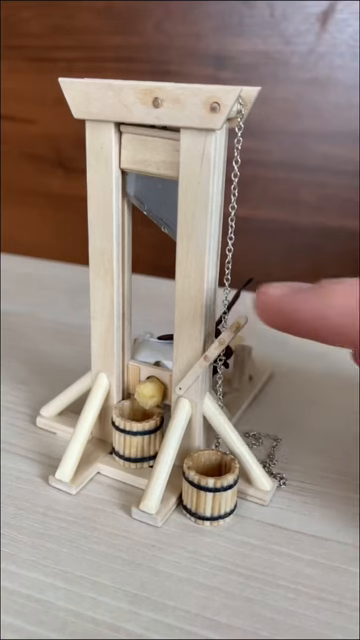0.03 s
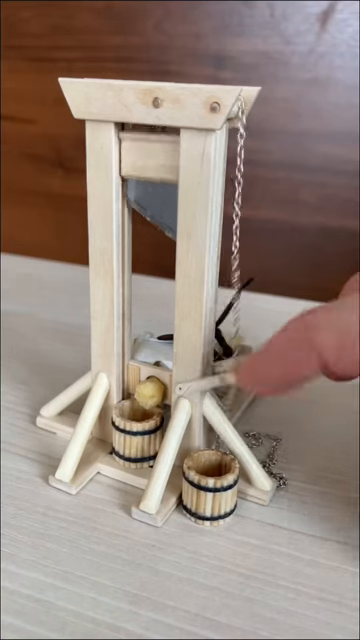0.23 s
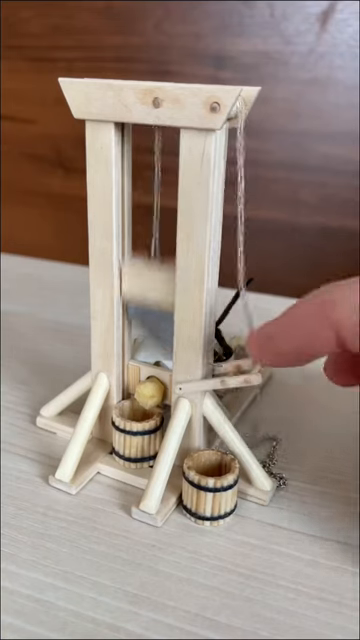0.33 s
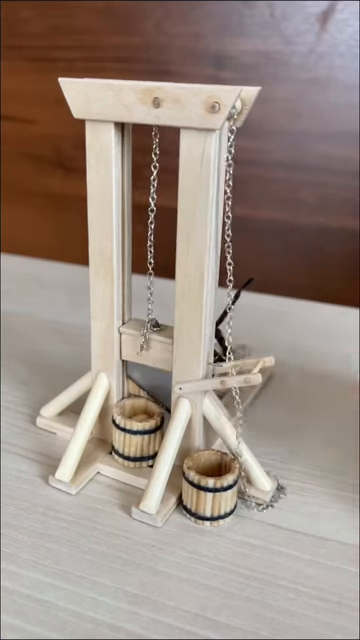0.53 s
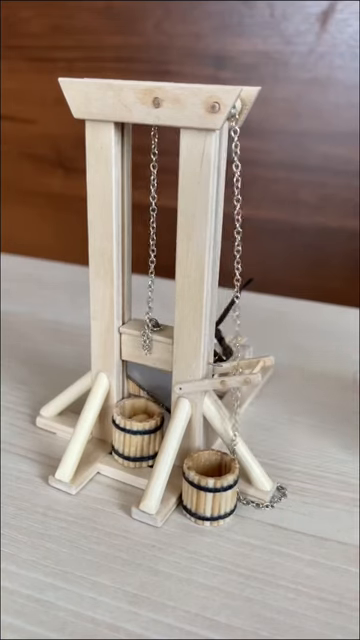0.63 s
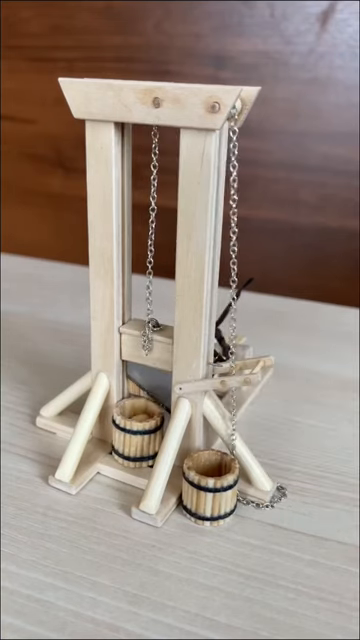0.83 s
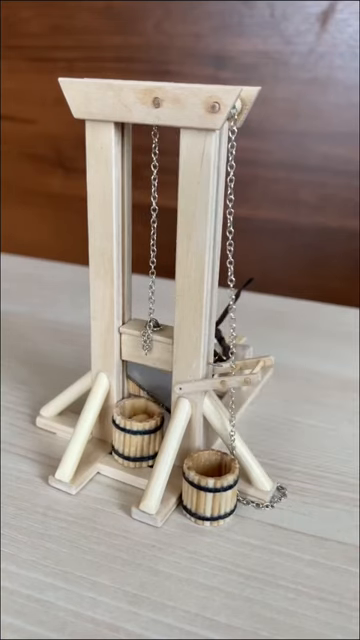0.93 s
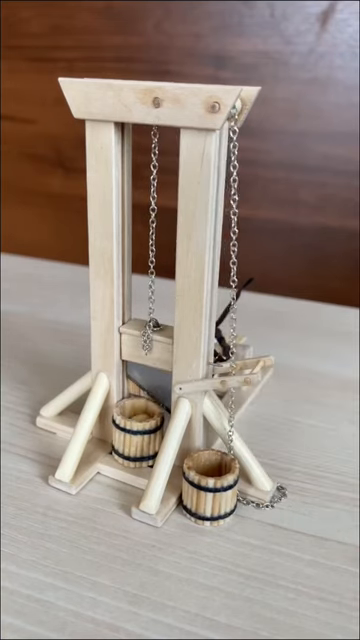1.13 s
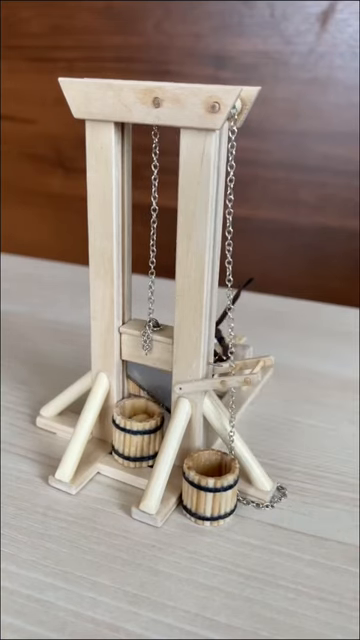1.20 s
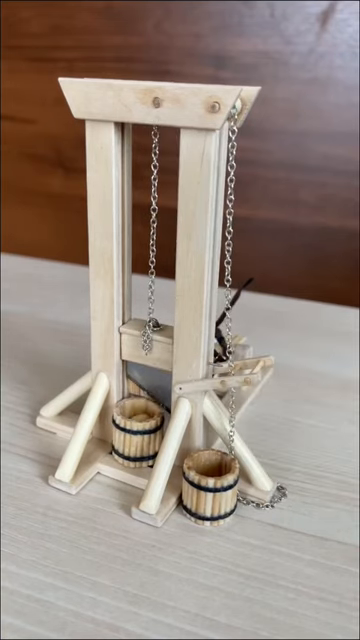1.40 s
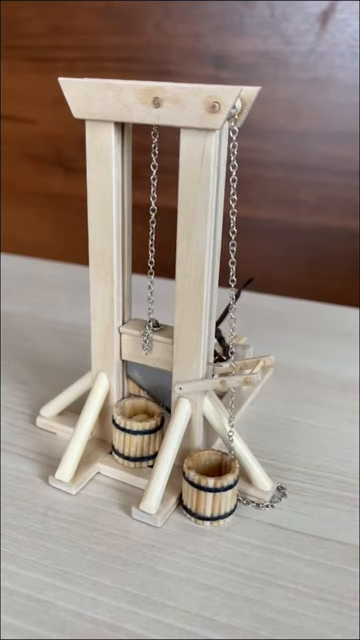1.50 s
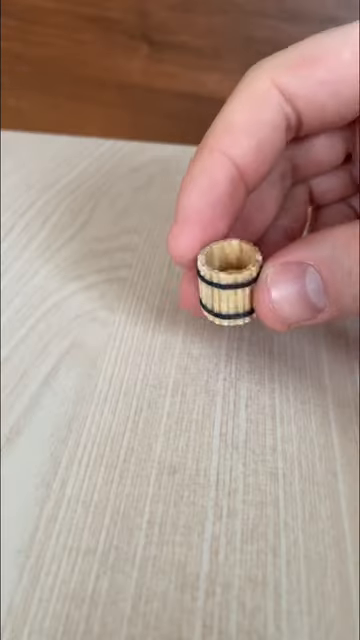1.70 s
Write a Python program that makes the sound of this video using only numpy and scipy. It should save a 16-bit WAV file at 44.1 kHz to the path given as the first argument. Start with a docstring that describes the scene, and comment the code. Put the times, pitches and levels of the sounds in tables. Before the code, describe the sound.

Heard up close, a toy wooden guillotine is tripped with a click. Its blade slides down with a thin chain rattle and knocks hard twice, then the links tinkle to rest over a faint low room hum.

```python
"""A low, wavering hum in a quiet room, then a click: a finger trips the lever of a small wooden guillotine.
The blade block scrapes down its grooves by stick-slip friction, dragging a fine chain over the top beam.
It lands with a double knock, an impact that excites the damped modes of the frame and the table beneath.
The chain jingles as its links collide and settle, and a few faint rustles follow."""
import sys
import numpy as np
from scipy import signal
from scipy.fft import rfft, irfft
from scipy.io import wavfile

SR = 44100
rng = np.random.default_rng(int(sys.argv[2]) if len(sys.argv) > 2 else 0)


def int16_out(signal):
    """Quantize to a 16-bit WAV file."""
    q = np.round(np.clip(np.atleast_2d(signal).T, -1, 1) * 32767)
    wavfile.write(sys.argv[1], SR, q.astype(np.int16))


N = 77175
T, HZ = np.arange(N) / SR, np.fft.rfftfreq(N, 1 / SR)

# spectra of the room's air and rumble, and their side-channel gain (frequency [Hz], level [dB])
AIR_SPECTRUM = [(20, -12.5), (50, 3), (110, 5.5), (170, -3.5), (300, -8), (600, -17), (950, -22),
                (1300, -30.5), (2300, -33.5), (4000, -38.5), (7000, -43.5), (12000, -48), (15000, -55.5)]
RUMBLE_SPECTRUM = [(20, -12.5), (50, -2.5), (100, -7.5), (150, 4.5), (260, -7.5), (450, -12.5), (1200, -30),
                   (4000, -70.5)]
AMBIENT_SIDE = [(60, -5.5), (150, -13), (380, -5.5), (950, -3), (5000, -1)]
# envelope of the hum (time [s], level [dB])
HUM_ENVELOPE = [(.03, -60.5), (.17, -68.5), (.36, -83), (.54, -50.5), (.59, -58), (.66, -48.5), (.70, -63),
                (.77, -46), (.83, -55.5), (1.05, -51), (1.22, -50), (1.5, -50), (1.6, -60.5),
                (1.695, -53.5), (1.72, -81.5)]
# reverberant tail (frequency [Hz], level [dB], T60 [s])
ROOM_BANDS = [(60, -11.5, 0.77), (170, -8, 1), (300, -1.5, 0.15), (798, 2, 0.17), (2630, -8, 0.41),
              (6100, -13.5, 0.29), (12000, -12.5, 0.083)]
# rustles as things come to rest (time [s], level [dB], rise [s], tilt [dB/octave])
RUSTLE_EVENTS = [(.816, -66, 0.047, -0.5), (.847, -69, 0.0058, -5.5), (.968, -63.5, 0.0045, -7.5)]
# spectrum of a rustle (frequency [Hz], level [dB])
RUSTLE_SPECTRUM = [(300, 4.5), (650, -4), (880, 11), (1250, -1.5), (2400, -8.5), (3200, -5.5),
                   (4300, -17.5), (5300, -7.5), (7200, -5), (9500, -22), (12000, -26.5)]
# envelope of the chain running over the beam (time [s], level [dB])
CHAIN_ENVELOPE = [(.2, -92), (.225, -64), (.275, -60), (.305, -53.5), (.342, -46.5), (.38, -44.5),
                  (.41, -49.5), (.45, -64), (.6, -69.5), (.66, -87), (.8, -87.5)]
# spectra of the running chain and of its slack landing (frequency [Hz], level [dB])
CHAIN_SPECTRUM = [(1500, -31), (4000, -2.5), (6600, 1.5), (7400, -1), (8200, -25), (9100, 4.5), (10500, 3),
                  (12000, 0), (13500, -1.5), (16000, -16.5)]
SPILL_SPECTRUM = [(500, -43.5), (1700, 1), (3000, -8.5), (4500, 0.5), (7500, 4), (9500, 3.5), (11500, -5.5),
                  (15500, -6)]
# lengths of slack chain landing (time [s], level [dB], twice the rise time [s])
SPILL_EVENTS = [(0.457, -55, 0.016), (0.477, -52, 0.0029), (0.488, -61.5, 0.012), (0.521, -50.5, 0.007),
                (0.536, -54, 0.011), (0.561, -49.5, 0.0041), (0.626, -65, 0.0074)]
# single links colliding (time [s], level [dB], frequency [Hz])
CLINK_EVENTS = [(0.1936, -54, 11500), (0.1977, -44, 15000), (0.22, -48, 10600), (.227, -49.5, 11000),
                (0.24, -51, 11100), (0.247, -37, 10500), (0.2606, -46.5, 11450), (0.308, -33, 11730),
                (0.325, -32.5, 11930), (0.389, -38.5, 10220), (.3965, -34.5, 10820), (0.4361, -46, 12500),
                (0.4642, -38.5, 9900), (0.479, -39.5, 7440), (.526, -48, 12000), (.565, -46.5, 9800),
                (0.6601, -47, 12000), (0.665, -54.5, 9450), (0.7251, -57.5, 10630), (0.761, -65, 10000),
                (.778, -67, 9340), (0.8466, -60, 9430)]
# modes of the catch and of the lever (frequency [Hz], level [dB], T60 [s])
CATCH_MODES = [(2645, -54, 0.0084), (3280, -53.5, .025)]
LEVER_MODES = [(1135, -48, 0.046), (1522, -44.5, 0.02796), (1680, -52.5, 0.034), (3340, -53, .03)]
# envelope of the block's scrape (time [s], level [dB])
SCRAPE_ENVELOPE = [(.205, -68.5), (.235, -57), (.275, -53), (.30, -49.5), (.335, -45.5), (.375, -46.5),
                   (.405, -40), (.44, -52.5), (.52, -63), (.62, -76.5), (.7, -90)]
# spectrum of the scrape, and its side-channel gain (frequency [Hz], level [dB])
SCRAPE_SPECTRUM = [(100, 7), (280, -3.5), (500, -6), (700, -2.5), (1100, -2), (1500, -4), (2050, -2),
                   (3050, 2.5), (3380, 5.5), (3850, -11), (5500, -11), (6500, -4.5), (7800, -32),
                   (16000, -33)]
SCRAPE_SIDE = [(100, -13), (380, 12), (1200, -8.5), (3500, -19.5), (8000, -2)]
# landings that set the table top ringing (time [s], level [dB])
TABLE_STRIKES = [(.379, -50.5), (.410, -43)]
# spectrum of the table top (frequency [Hz], level [dB])
TABLE_SPECTRUM = [(90, -18), (170, -9), (490, 2.5), (630, -14), (850, -3), (1150, -25.5), (3000, -55)]
# the base knocking on the table (time [s], level [dB], frequency [Hz], rise [s], left-right phase [rad])
THUMP_EVENTS = [(0.22, -48, 61, 0.013, 0.5), (.226, -49.5, 300, 0.0016, 1), (.241, -50, 284, 0.0031, -1),
                (0.3826, -28.5, 314.6, 0.0012, 2), (0.38, -48, 199.4, 0.005, -0.5),
                (0.395, -49, 91.3, 0.029, 0), (.42, -40, 254.5, .003, 1.96),
                (0.683, -57.5, 255, 0.004, 0.5)]
# wood on wood: the catch letting go, the block landing and rattling, a last shift
# (time [s], level [dB], T60 factor [ratio], tilt [dB/octave])
KNOCK_EVENTS = [(0.1982, -50, 0.92, 5), (.3771, -38.5, 0.46, -4), (.378, -24, 0.77, 1),
                (.3804, -34, 1.2, 1.5), (0.3949, -36, 0.82, 1.5), (.40748, -22, 0.76, 5),
                (.4087, -22.5, 0.56, 6.5), (0.4104, -34.5, 0.41, 13.5), (.4136, -39.5, .9, -3.5),
                (.4345, -40.5, 0.73, 11), (.661, -66, 2.6, -5)]
# modes of the wooden frame (frequency [Hz], level [dB], T60 [s])
FRAME_MODES = [(826, -11.5, 0.038), (880, -14.5, 0.099), (1420, -16, 0.02), (1507, -7, 0.035),
               (1678, -2, 0.035), (2085, -5, .03), (2424, -2, 0.021), (2670, -7, 0.019), (2795, -5, 0.051),
               (3250, -13.5, .03), (3254, -11, 0.038), (4800, -11, 0.015)]
# treble colour of the whole sound: a dip near 8 kHz and a softened top (frequency [Hz], gain [dB])
TREBLE_COLOUR = [(7000, 0), (7600, -3), (8200, -15.5), (9000, -1), (13700, 1), (15000, -8.5), (16000, -11)]


def amp(db):
    """Amplitude ratio of a level in decibels."""
    return 10 ** (np.asarray(db) / 20)


def unit(x):
    """Normalisation to an rms of 1."""
    return x / np.sqrt(np.mean(x ** 2) + 1e-20)


def read(points, hz):
    """Interpolation on a log-frequency axis."""
    f, value = np.transpose(points)
    return np.interp(np.log(hz + 1), np.log(f + 1), value)


def envelope(points):
    """Amplitude envelope from a dB curve, silent outside it."""
    return amp(np.interp(T, *np.transpose(points), left=-np.inf, right=-np.inf))


def add(mix, start, sound):
    """Superposition of a stereo sound from a start time in seconds."""
    part = mix[:, round(start * SR):][:, :sound.shape[1]]
    part += sound[:, :part.shape[1]]


def tint(x, spectrum):
    """Zero-phase filtering by a dB spectrum."""
    return irfft(rfft(x) * amp(read(spectrum, HZ)), N)


def stereo(mid, side):
    """Left and right as sum and difference."""
    return np.array([mid + side, mid - side])


def drift():
    """Slow random modulation: low-passed noise of rms 1."""
    return unit(irfft(rfft(rng.standard_normal(N)) * np.exp(-(HZ / 14) ** 2), N))


def grains(per_s, spread_db, t60=0.0071):
    """Shot noise in two channels: random tiny contacts, each exciting one of 16 brief rings."""
    size = amp(spread_db * np.minimum(rng.exponential(1, N), 4))
    contacts = size * (rng.random(N) < per_s / SR)
    kind = rng.integers(0, 16, N)
    rings = rng.standard_normal((16, 2, 1024)) * amp(-60 * T[:1024] / t60)
    return unit(sum(signal.oaconvolve((contacts * (kind == k))[None], ring, axes=1)[:, :N]
                    for k, ring in enumerate(rings)))


def room_noise(spectrum):
    """Filtered Gaussian noise, partly coherent between left and right."""
    mid, side = rng.standard_normal((2, N))
    return unit(tint(stereo(mid, tint(side, AMBIENT_SIDE)), spectrum))


def hum(pitch_hz=70.7, wander_hz=2.76, waver_db=1.5):
    """A low tone wavers under random frequency and amplitude modulation."""
    hz = pitch_hz + wander_hz * drift()
    db = np.interp(T, *np.transpose(HUM_ENVELOPE)) + waver_db * drift()
    return amp(db) * unit(np.sin(2 * np.pi * np.cumsum(hz) / SR))


def background():
    """Superposition of steady air, uneven rumble and hum, slightly louder on the left."""
    air = amp(-62) * room_noise(AIR_SPECTRUM)
    rumble = room_noise(RUMBLE_SPECTRUM)
    return (air + hum() + amp(-71 + 2.5 * drift()) * rumble) * amp([[.7], [-.7]])


def room(x, send_db=0, near_db=-7, near_t60=.03, tail_db=-4.5, tail_delay_s=0.0048):
    """Reverberation: early reflections from table and frame, then a tail with a decay time per band."""
    t, bands = T[:SR // 2], np.array(ROOM_BANDS)
    near = rng.standard_normal((2, len(t))) * amp(-60 * t / near_t60) * (t > .001)
    near = signal.sosfilt(signal.butter(2, 200, "high", fs=SR, output="sos"), near)
    hz, when, diffuse = signal.stft(rng.standard_normal((2, len(t))), SR, nperseg=256)
    diffuse *= amp(-60 * when / read(bands[:, [0, 2]], hz)[:, None])
    uncoloured = signal.istft(diffuse, SR, nperseg=256)[1]
    diffuse *= amp(read(bands[:, :2], hz))[:, None]
    tail = signal.istft(diffuse, SR, nperseg=256)[1][:, :len(t)] * (t > tail_delay_s)
    response = amp(near_db) * near / np.linalg.norm(near[0])
    response += amp(tail_db) * tail / np.linalg.norm(uncoloured[0])
    return x + amp(send_db) * signal.fftconvolve(x, response, axes=1)[:, :N]


def rustles():
    """Light friction: grainy rubs swell and fade, the later ones duller."""
    out = 0
    for start, db, rise, tilt in RUSTLE_EVENTS:
        age = np.maximum(T - start, 0) / rise
        spectrum = [(hz, band_db + tilt * np.log2(hz / 1000)) for hz, band_db in RUSTLE_SPECTRUM]
        rub = unit(tint(grains(per_s=1500, spread_db=0), spectrum))
        out += amp(db) * (age * np.exp(1 - age)) ** 2 * rub
    return out


def chain():
    """Dense collisions merge into noise: links rattle over the beam, then the slack lands in spills."""
    mid, side = grains(per_s=2800, spread_db=4.5)
    rattle = unit(tint(stereo(mid, amp(-2) * side), CHAIN_SPECTRUM))
    spill = unit(tint(grains(per_s=2200, spread_db=1.5), SPILL_SPECTRUM))
    spill_gain = 0
    for start, db, length in SPILL_EVENTS:
        age = np.maximum(T - start, 0) / (length / 2)
        spill_gain += amp(db) * age * np.exp(1 - age)
    return envelope(CHAIN_ENVELOPE) * rattle + spill_gain * spill


def clinks(rise_s=0.00086, t60=0.013, half_width_hz=610, tick_db=-12.5):
    """Resonance of a struck link: a cluster of short, high metal modes over a faint broadband tick."""
    out, t = np.zeros((2, N)), T[:2048]
    hz = np.fft.rfftfreq(len(t), 1 / SR)
    tick = amp(tick_db) * hz / (hz + 1500)
    for start, db, pitch in CLINK_EVENTS:
        resonance = 1 / (1 + ((hz - pitch) / half_width_hz) ** 2)
        phasors = np.exp(2j * np.pi * rng.random((2, len(hz))))
        ring = unit(irfft((resonance + tick) * phasors))
        add(out, start, amp(db - 60 * t / t60) * np.minimum(t / rise_s, 1) * ring)
    return out


def struck(modes, start_s, rise_s):
    """Free vibration: damped sinusoids after a linear attack."""
    t = np.maximum(T - start_s, 0)
    decay_s = np.maximum(t - rise_s, 0)
    ring = sum(amp(db - 60 * decay_s / t60) * np.sin(2 * np.pi * hz * t) for hz, db, t60 in modes)
    return np.minimum(t / rise_s, 1) * ring


def lever():
    """Impulsive excitation: the catch slips with a click, the lever meets its stop with a hollow tock."""
    click = struck(CATCH_MODES, start_s=.1945, rise_s=.0012)
    tock = struck(LEVER_MODES, start_s=.2218, rise_s=.0015)
    return stereo(click + tock, 0)


def scrape():
    """Stick-slip friction of wood on wood, stronger as the block gathers speed."""
    mid, side = grains(per_s=3500, spread_db=-1.5, t60=0.002)
    slips = stereo(mid, tint(side, SCRAPE_SIDE))
    return envelope(SCRAPE_ENVELOPE) * unit(tint(slips, SCRAPE_SPECTRUM))


def table_ring(rise_s=.005, t60=0.3, side_db=2):
    """Modal overlap: the table top's many close modes ring as decaying noise after each landing."""
    mid, side = rng.standard_normal((2, N))
    gain = 0
    for start, db in TABLE_STRIKES:
        t = np.maximum(T - start, 0)
        gain += np.minimum(t / rise_s, 1) * amp(db - 60 * t / t60)
    return gain * unit(tint(stereo(mid, amp(side_db) * side), TABLE_SPECTRUM))


def thumps():
    """Heavy damping: knocked by the base, the table top swells and dies within a few cycles."""
    out, t = np.zeros((2, N)), T[:SR // 5]
    for start, db, hz, rise, phase in THUMP_EVENTS:
        swell = t / rise * np.exp(1 - t / rise)
        add(out, start, amp(db) * swell * np.sin(2 * np.pi * hz * t + np.array([[phase], [0]])))
    return out


def knocks(contact_band_hz=(617, 3800), side_db=-7.5):
    """Modal response of the frame: firm contact damps the ring, and soft wood rounds the attack."""
    out, t = np.zeros((2, N)), T[:SR // 5]
    for start, db, t60_factor, tilt in KNOCK_EVENTS:
        mid = side = 0
        for hz, mode_db, t60 in FRAME_MODES:
            onset_db = db + mode_db + tilt * np.log2(hz / 2000)
            decay = amp(onset_db - 60 * t / (t60 * t60_factor)) / 2
            mid += decay * np.sin(2 * np.pi * hz * t)
            side += decay * np.sin(2 * np.pi * (hz * t + rng.random()))
        add(out, start, stereo(mid, amp(side_db) * side))
    return signal.sosfilt(signal.butter(3, contact_band_hz, "band", fs=SR, output="sos"), out)


def scene():
    """Direct and reflected sound add to the background; single links sound drier than the wood."""
    guillotine = lever() + knocks() + thumps() + scrape() + chain() + rustles()
    return room(guillotine) + room(clinks(), send_db=-7.5) + table_ring() + background()


def record(dry, cutoff_hz=15900):
    """Linear filtering of the whole sound: a dip near 8 kHz and a softened top, then a steep low-pass."""
    lowpass = signal.firwin(511, cutoff_hz, window=("kaiser", 9), fs=SR)
    return signal.oaconvolve(tint(dry, TREBLE_COLOUR), lowpass[None], "same")


dry = scene()
out = record(dry)
int16_out(out)
```